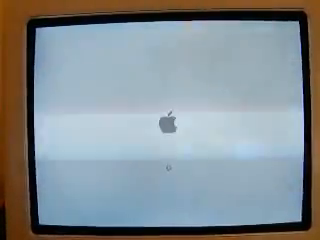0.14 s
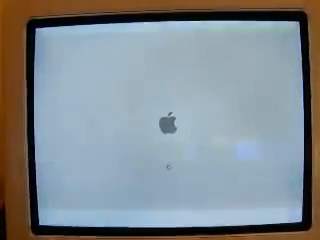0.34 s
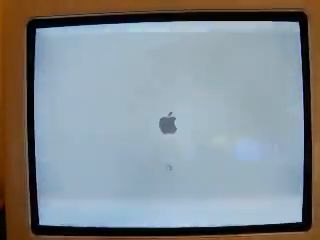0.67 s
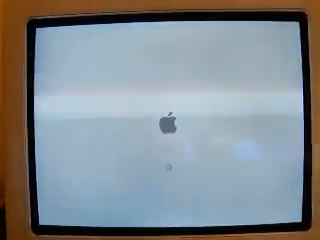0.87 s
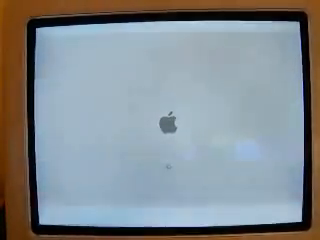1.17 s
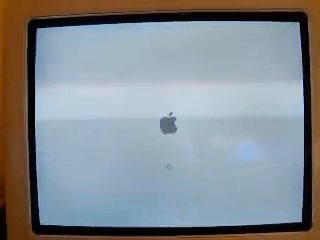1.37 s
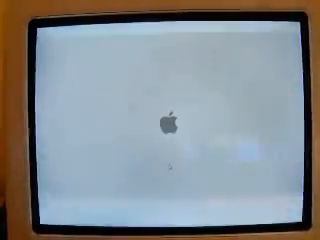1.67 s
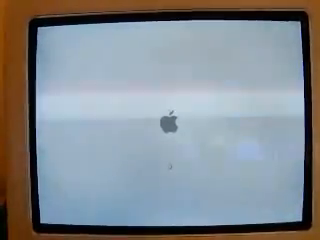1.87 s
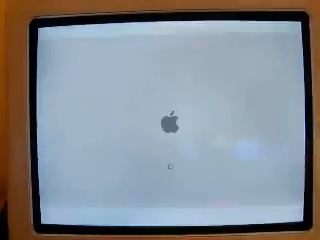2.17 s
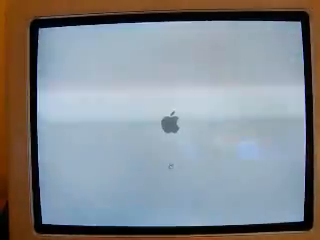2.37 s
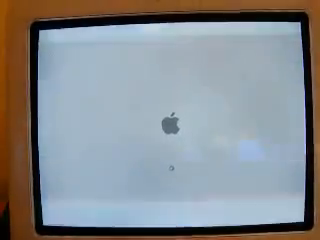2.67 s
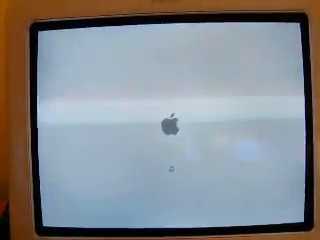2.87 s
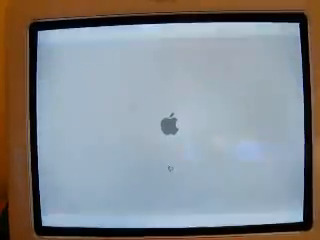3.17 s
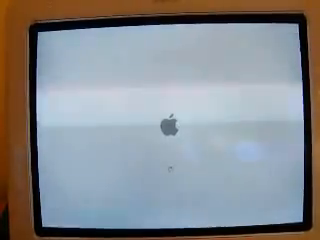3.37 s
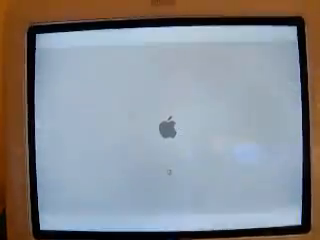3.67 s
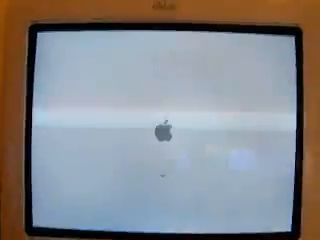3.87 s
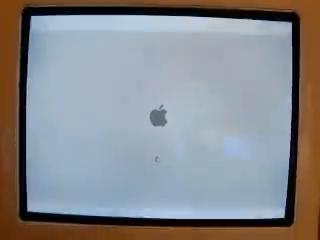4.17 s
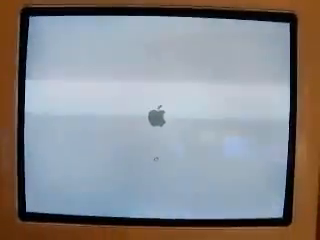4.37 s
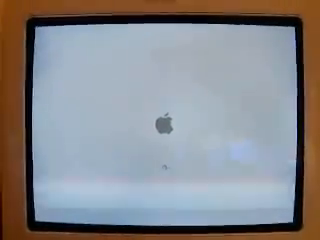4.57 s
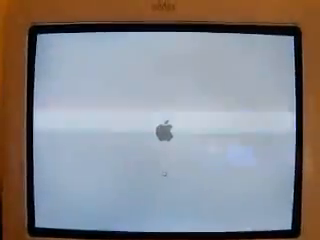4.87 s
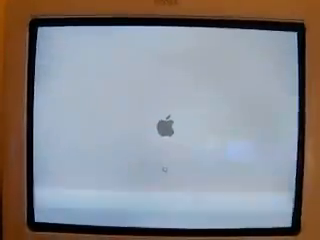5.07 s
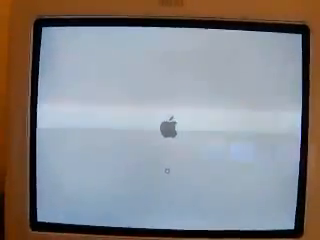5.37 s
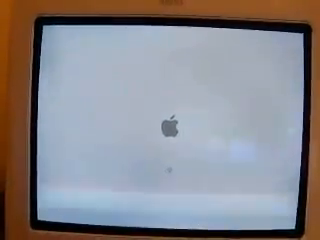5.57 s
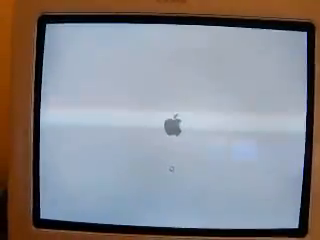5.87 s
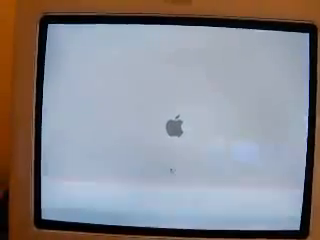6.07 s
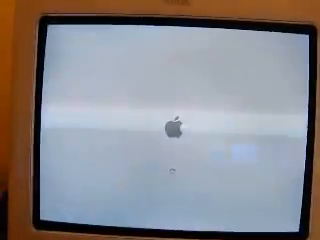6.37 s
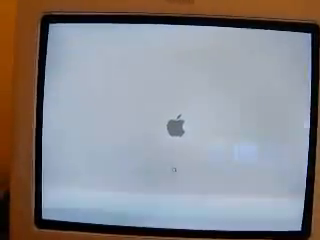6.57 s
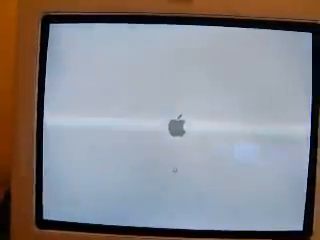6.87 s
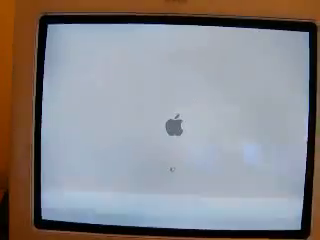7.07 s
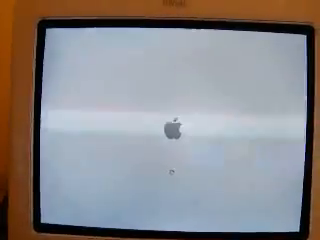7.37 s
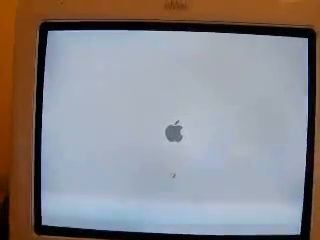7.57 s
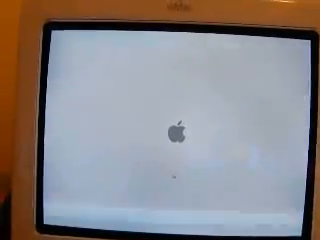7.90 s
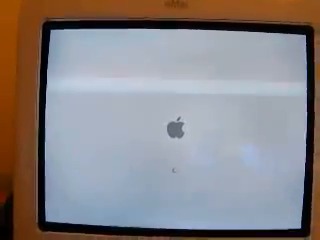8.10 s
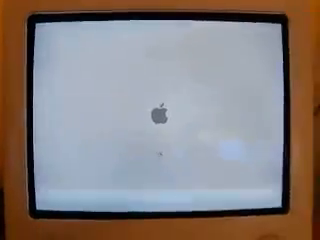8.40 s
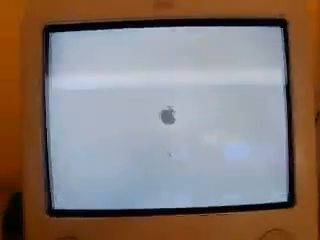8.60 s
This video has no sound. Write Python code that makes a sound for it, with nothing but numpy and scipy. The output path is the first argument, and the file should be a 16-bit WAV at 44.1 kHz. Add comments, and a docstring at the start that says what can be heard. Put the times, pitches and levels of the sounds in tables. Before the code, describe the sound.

An old desktop computer whirs and hums steadily with a thin whine, interrupted midway by microphone handling knocks and clicks.

```python
"""An old desktop computer in a quiet room, close to a hand-held mono microphone.
Throughout: fan air through the plastic case's resonances, motor hum, thin drive whine, a surge each second.
Near 1.9 s, one light plastic click. From 3.8 s the hand shifts on the microphone's housing: rumble,
dull knocks, more clicks. From 4.7 s the palm brushes it now and then; a faint rumble returns at 8.1 s."""
import sys
import numpy as np
from scipy import signal
from scipy.fft import rfft, irfft
from scipy.io import wavfile
from scipy.ndimage import uniform_filter1d

SR = 44100
rng = np.random.default_rng(int(sys.argv[2]) if len(sys.argv) > 2 else 0)


def dump_mix(stems):
    """Bounce the given channels to the path in sys.argv[1] as a 16-bit WAV at rate SR."""
    frames = np.atleast_2d(stems).T  # one column per channel
    limited = np.clip(frames, -1, 1)  # hard clip at full scale
    pcm = np.round(limited * 32767).astype(np.int16)
    wavfile.write(sys.argv[1], SR, pcm)


N = 385434
TIME_S = np.arange(N) / SR
BINS_HZ = np.maximum(np.arange(N // 2 + 1) * SR / N, 1)

# case and vent resonances (frequency [Hz], width [Hz], density [dB])
CASE_MODES = [(197.2, 25.3, -55.5), (237.3, 19, -58), (308.2, 67.3, -56.5), (406.4, 20.7, -61),
              (532, 150, -67), (692.5, 63, -63.7), (901, 56, -65), (1030, 80, -71), (1200, 58, -67),
              (1340, 160, -71.5), (1613, 65, -70), (1804.5, 94, -63), (2288, 116, -66.5), (2472, 75, -67.5),
              (3512, 293, -66.5), (3636, 120, -62), (3796, 130, -61.5), (4265, 100, -68),
              (4412, 168, -67.5), (4720, 110, -77), (5140, 370, -84), (5320, 191, -89.5),
              (5570, 129, -87.5), (6160, 77, -99), (6543, 260, -89.5), (7230, 180, -104.6)]
# air rush between the resonances (frequency [Hz], density [dB])
AIR_SPECTRUM = [(15, -74.5), (28, -70.5), (62, -74), (100, -67), (155, -82.5), (480, -70.5), (790, -83),
                (1500, -82), (2050, -86.5), (3100, -82), (4050, -91), (6000, -90.5), (7000, -122.5),
                (7700, -129.5)]
# fan and motor hum low, drive whine high (frequency [Hz], level [dB])
MOTOR_TONES = [(129.2, -50.5), (212.6, -40), (236.9, -46), (336.5, -47), (425.3, -58), (678.3, -56),
               (839.8, -55.5), (942.1, -69), (1559.8, -65.5), (1752.3, -59), (1903.0, -64), (2271.8, -56),
               (2370.0, -57.5), (2438, -56), (2468.2, -66.5), (3005.2, -61.5), (3127, -64.5),
               (3228.6, -65.5), (3495.1, -62), (3593.4, -51.5), (3662, -50.5), (3732.0, -54),
               (3785.8, -51.5), (3830.2, -58), (3936.5, -64), (4199.0, -57), (4305.3, -58.5), (4403.5, -50),
               (4469, -55), (6620.1, -73.5)]
# slow swell of the whir (time [s], gain [dB])
WHIR_SWELL = [(0.0, -2), (1.05, 0.5), (1.5, -1), (2.3, -0.5), (3.25, -1), (3.7, 0), (4.3, 1.5), (4.95, 1),
              (5.25, 0), (5.6, -1.5), (6.1, 0), (6.35, 0.5), (6.65, -0.1), (7.15, -0.25), (7.7, 1.1),
              (8.1, -0.5), (8.55, 1), (8.73, -1)]
# whir surges, about 1 s apart (start [s], length [s], gain [dB])
WHIR_SURGES = [(0.147, 0.12, 2), (0.736, 0.1, 3.5), (1.721, 0.089, 3), (2.72, 0.21, 2.5), (3.807, 0.066, 3),
               (4.674, 0.22, 1.5), (5.712, 0.15, 3), (6.742, 0.17, 2), (7.74, 0.14, 2)]
# brief hiss dips (start [s], length [s], depth [dB])
HISS_DIPS = [(0.108, 0.011, 6), (0.182, 0.016, 8), (0.35, 0.013, 6), (0.706, 0.031, 4.5),
             (0.893, 0.012, 10), (0.939, 0.046, 8), (1.17, 0.056, 4), (1.252, 0.015, 6), (1.478, 0.014, 8),
             (2.162, 0.039, 5), (2.703, 0.024, 5), (2.994, 0.016, 9), (3.217, 0.011, 5.5),
             (3.755, 0.025, 4), (3.894, 0.074, 4), (4.182, 0.027, 8.5), (4.251, 0.0096, 16),
             (4.327, 0.036, 6), (4.598, 0.082, 3.5), (5.66, 0.014, 4), (5.9, 0.045, 5), (6.052, 0.017, 7),
             (6.055, 0.12, 3), (6.168, 0.098, 13), (6.408, 0.017, 10), (6.566, 0.016, 8), (7.381, 0.02, 6),
             (8.045, 0.029, 5.5), (8.312, 0.018, 8), (8.359, 0.014, 7)]
# brief hiss flares (time [s], gain [dB])
HISS_FLARES = [(0.177, 4.5), (0.912, 1), (0.985, 6), (2.257, 9.5), (2.742, 5.5), (3.845, 3), (4.695, 7.5),
               (5.864, 8.5), (7.256, 8), (7.571, 5), (7.846, 7), (8.025, 5), (8.551, 6)]
# boom of the case (time [s], rms level [dB])
BOOM_LEVEL = [(0, -45), (1.8, -44), (3.3, -43), (4.3, -49), (5.2, -46), (6.3, -46.5), (7.2, -48.5),
              (8.7, -48)]
# background hiss (frequency [Hz], density [dB])
ROOM_SPECTRUM = [(100, -82.5), (3000, -81), (5000, -88), (6200, -102), (7200, -120)]
# plastic contacts (time [s], level [dB], low edge [Hz], high edge [Hz])
CLICKS = [(1.898, -7, 300, 1610), (3.9442, -2, 3300, 5900), (4.034, -8, 3500, 5800),
          (4.6283, 7.5, 1400, 4800), (4.62945, 3.5, 200, 2000)]
# ringing of the clicked plastic (frequency [Hz], gain [dB], t60 [s])
PLASTIC_MODES = [(260, -15, 0.026), (576, -20, 0.028), (1260, -14, 0.0071), (2130, -20, 0.012),
                 (3050, -24, 0.0045), (3700, -23, 0.0091), (4130, -16, 0.0061), (5150, -19, 0.0037),
                 (5940, -23, 0.0046)]
# finger drags on the housing (start [s], length [s], rms level [dB])
FINGER_RUBS = [(3.8, 0.14, -37), (4.037, 0.092, -29), (4.184, 0.33, -45), (4.44, 0.38, -46),
               (8.1, 0.73, -49.5)]
# finger rumble (frequency [Hz], relative density [dB])
RUMBLE_SPECTRUM = [(12, -20.5), (24, -2.5), (34, -1.5), (55, -10.5), (100, -10), (200, -26), (600, -31.5),
                   (2000, -73)]
# knocks on the housing (time [s], level [dB], contact time [s])
KNOCKS = [(4.0338, -13, 0.00042), (4.037, -13.5, 0.00021), (4.052, -18.5, 0.00053), (4.0622, -21, 0.00054),
          (4.086, -25, 0.00016), (4.1703, -0.9, 0.00027)]
# ringing of the knocked housing (frequency [Hz], gain [dB], t60 [s])
HOUSING_MODES = [(1000, -24.5, 0.049), (1400, -33, .014), (1810, -26, .012), (2380, -29, .008),
                 (3050, -18, 0.0098)]
# palm strokes (start [s], length [s], rub level [dB], rustle level [dB])
PALM_BRUSHES = [(4.68, 0.43, -41, -56), (6.1, 0.049, -48, -49), (6.15, 0.85, -47.5, -64),
                (6.773, 0.11, -45, -54), (7.45, 0.35, -42.5, -59), (8.45, 0.18, -52, -60)]


def from_db(db):
    """Decibels to gain."""
    return 10 ** (np.asarray(db) / 20)


def curve(points):
    """(time [s], value) points at every sample."""
    return np.interp(TIME_S, *np.transpose(points))


def spectrum(points):
    """(frequency [Hz], level [dB]) points to gain per bin."""
    hz, db = np.transpose(points)
    return from_db(np.interp(np.log(BINS_HZ), np.log(hz), db))


def gate(start_s, length_s, attack_s, release_s):
    """Trapezoid envelope, half open at start and end."""
    rise = (TIME_S - start_s) / attack_s
    fall = (start_s + length_s - TIME_S) / release_s
    return np.clip(.5 + np.minimum(rise, fall), 0, 1)


def noise(density):
    """Steady noise of given amplitude per root Hz."""
    return irfft(rfft(rng.standard_normal(N)) * density * np.sqrt(SR / 2), N)


def noise_band(centre_hz, width_hz, slope=4, stages=1):
    """Unit-rms noise around a centre frequency."""
    x = noise(1 / (1 + ((BINS_HZ - centre_hz) / width_hz) ** slope) ** stages)
    return x / np.std(x)


def drift(rate_hz):
    """Unit-rms random wander, mostly below rate_hz."""
    return noise_band(0, rate_hz, slope=2)


def split(x, edge_hz):
    """Parts below and above an edge."""
    low = irfft(rfft(x) / (1 + (BINS_HZ / edge_hz) ** 6), N)
    return low, x - low


def even_out(x, share, window_s=0.0057):
    """Remove a share of the level swings; keep mean power."""
    power = uniform_filter1d(x ** 2, round(window_s * SR)) + 1e-12
    even = x / power ** (share / 2)
    return even * np.std(x) / np.std(even)


def butterworth(x, edges_hz, kind, order=2):
    """Causal Butterworth filter."""
    return signal.sosfilt(signal.butter(order, edges_hz, kind, fs=SR, output="sos"), x + 1e-18)


def impulse(time_s, db):
    """One nonzero sample."""
    x = np.zeros(N)
    x[round(time_s * SR)] = from_db(db)
    return x


def ring(x, hz, t60_s):
    """One mode: a unit impulse starts a decaying unit sine."""
    radius, angle = from_db(-60 / (t60_s * SR)), 2 * np.pi * hz / SR
    return signal.lfilter([0, np.sin(angle)], [1, -2 * radius * np.cos(angle), radius ** 2], x + 1e-18)


def fan_air(gain_db=0.31):
    """Turbulence, strongest where the case resonates."""
    power = spectrum(AIR_SPECTRUM) ** 2
    for hz, width_hz, db in CASE_MODES:
        power += from_db(db) ** 2 / (1 + ((BINS_HZ - hz) / width_hz) ** 2) ** 3
    return from_db(gain_db) * noise(np.sqrt(power))


def motor_tones(gain_db=-1.0, wander_hz=1.113, shimmer_db=2.5):
    """Rotor tones, each wandering slightly in pitch and level."""
    tones = np.zeros(N)
    for hz, db in MOTOR_TONES:
        cycles = np.cumsum(hz + wander_hz * drift(rate_hz=2.38)) / SR + rng.random()
        amplitude = np.sqrt(2) * from_db(db + shimmer_db * drift(rate_hz=21))
        tones += amplitude * np.sin(2 * np.pi * cycles)
    return from_db(gain_db) * tones


def hiss_waver_db(sag_db=1.62, flutter_db=1.4, chatter_db=2.0, rasp_db=2.25, crest_db=1.5,
                  flare_width_s=0.0034):
    """Fast level changes: timed dips and flares, random sags and roughness."""
    dips = sum(db * gate(start_s, length_s, attack_s=0.0079, release_s=0.23 * length_s)
               for start_s, length_s, db in HISS_DIPS)
    flares = sum(db * np.exp(-.5 * ((TIME_S - time_s) / flare_width_s) ** 2)
                 for time_s, db in HISS_FLARES)
    sags = sag_db * np.maximum(drift(rate_hz=20), 0)
    flutter = flutter_db * drift(rate_hz=45)
    chatter = chatter_db * noise_band(centre_hz=86, width_hz=62)
    rasp = rasp_db * drift(rate_hz=190)
    roughness = np.minimum(flutter + chatter + rasp, crest_db)   # deep troughs, flat crests
    return roughness + flares - dips - sags


def computer_whir(bass_db=0.14, mid_db=0.03, hiss_db=-0.66, bass_swell_share=0.2, mid_waver_share=0.42):
    """Fan air plus motors: bass nearly steady, mids and hiss surging and wavering in step."""
    bass, upper = split(fan_air() + motor_tones(), edge_hz=270)
    mids, treble = split(upper, edge_hz=1320)
    hiss = sum(even_out(part, share=0.4) for part in split(treble, edge_hz=4200))
    surges_db = sum(db * gate(start_s, length_s, attack_s=0.04, release_s=0.04)
                    for start_s, length_s, db in WHIR_SURGES)
    swell_db = curve(WHIR_SWELL) + surges_db
    waver_db = hiss_waver_db()
    return (bass * from_db(bass_db + bass_swell_share * swell_db)
            + mids * from_db(mid_db + swell_db + mid_waver_share * waver_db)
            + hiss * from_db(hiss_db + swell_db + waver_db))


def case_boom():
    """Lowest resonance of the air in the case; weaker once the microphone has moved."""
    return from_db(curve(BOOM_LEVEL)) * noise_band(centre_hz=126.4, width_hz=18, slope=2, stages=1.5)


def room_hiss():
    """Faint, even background hiss."""
    return noise(spectrum(ROOM_SPECTRUM))


def plastic_clicks(snap_db=-2, top_hz=6300):
    """Each contact is a band-limited snap that rings the plastic."""
    force = sum(butterworth(impulse(time_s, db), [low_hz, high_hz], "band")
                for time_s, db, low_hz, high_hz in CLICKS)
    ringing = sum(from_db(db) * ring(force, hz, t60_s) for hz, db, t60_s in PLASTIC_MODES)
    return butterworth(from_db(snap_db) * force + ringing, top_hz, "low", order=8)


def finger_rumble():
    """Dragging fingers shake the microphone; one slip of the grip leaves it wobbling."""
    rumble = noise(spectrum(RUMBLE_SPECTRUM))
    pressure = sum(from_db(db) * gate(start_s, length_s, attack_s=0.008, release_s=0.029)
                   for start_s, length_s, db in FINGER_RUBS)
    wobble = ring(impulse(time_s=4.045, db=-17.5), hz=31, t60_s=0.38)
    return pressure * rumble / np.std(rumble) - wobble


def housing_knocks(rebound_share=0.36, rebound_delay_s=0.0041, rebound_width_s=0.00098):
    """A short push, a slower spring back, and a crack from the ringing housing."""
    push, touches = np.zeros(N), np.zeros(N)
    for time_s, db, contact_s in KNOCKS:
        press = np.exp(-.5 * ((TIME_S - time_s) / contact_s) ** 2)
        rebound = np.exp(-.5 * ((TIME_S - time_s - rebound_delay_s) / rebound_width_s) ** 2)
        push += from_db(db) * (press - rebound_share * rebound)
        touches += impulse(time_s - contact_s, db)
    return push + sum(from_db(db) * ring(touches, hz, t60_s) for hz, db, t60_s in HOUSING_MODES)


def palm_brushes(edge_s=0.12):
    """Palm friction on the housing: hollow swells with a faint high rustle."""
    rub = noise_band(centre_hz=524, width_hz=94)
    rustle = noise_band(centre_hz=5300, width_hz=620)
    strokes = np.zeros(N)
    for start_s, length_s, rub_db, rustle_db in PALM_BRUSHES:
        friction = from_db(rub_db) * rub + from_db(rustle_db) * rustle
        strokes += gate(start_s, length_s, edge_s, edge_s) * friction
    return strokes


def scene():
    """One microphone feeds both channels."""
    background = computer_whir() + case_boom() + room_hiss()
    handling = plastic_clicks() + finger_rumble() + housing_knocks() + palm_brushes()
    mono = background + handling
    return np.array([mono, mono])


def record(dry, mic_top_hz=7400, full_scale=0.99, output_top_hz=16000):
    """Narrow-band microphone; the hardest knock overloads, adding a thin snap above the band."""
    mic_lowpass = signal.ellip(10, .1, 80, mic_top_hz, fs=SR, output="sos")
    output_lowpass = signal.ellip(10, .1, 80, output_top_hz, fs=SR, output="sos")
    clipped = np.clip(signal.sosfilt(mic_lowpass, dry), -full_scale, full_scale)
    return signal.sosfilt(output_lowpass, clipped)


dry = scene()
out = record(dry)
dump_mix(out)
```